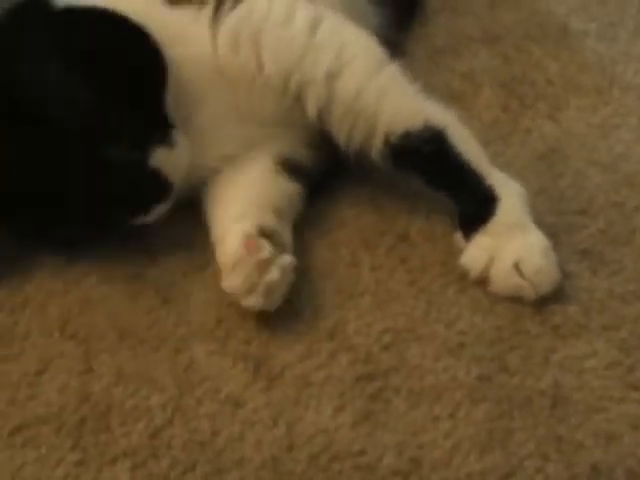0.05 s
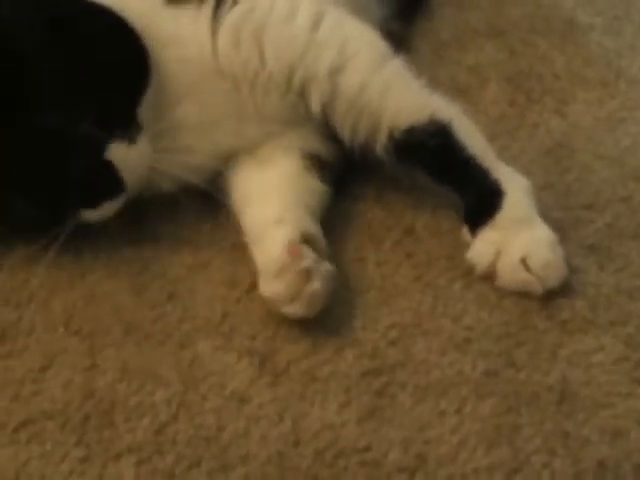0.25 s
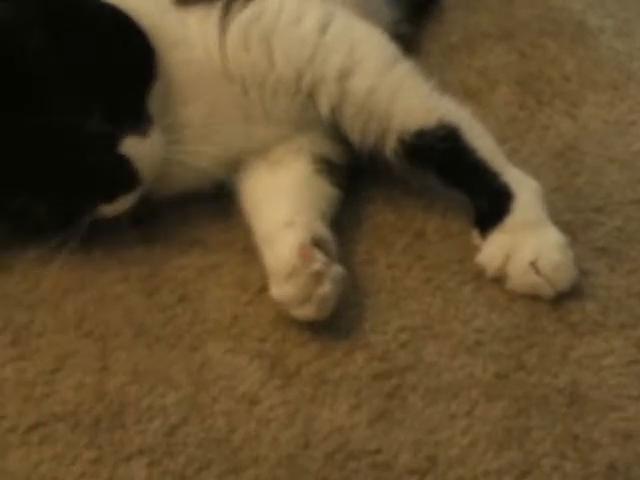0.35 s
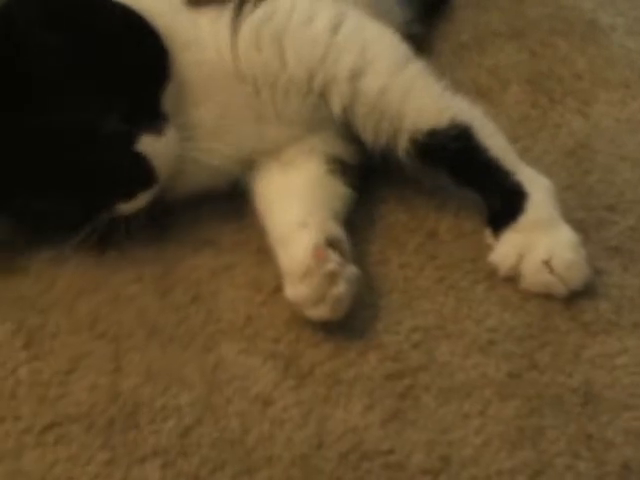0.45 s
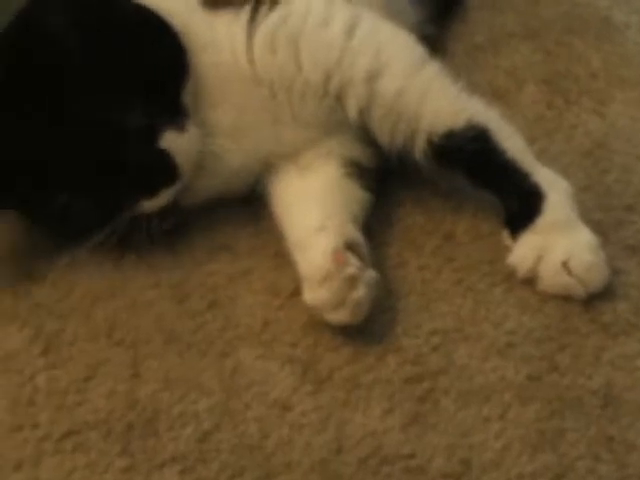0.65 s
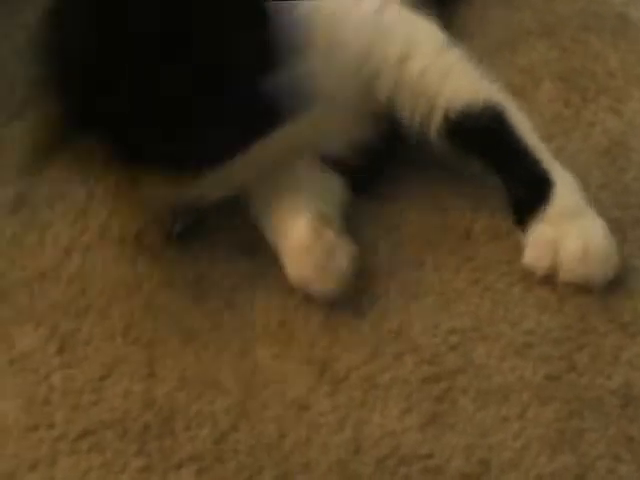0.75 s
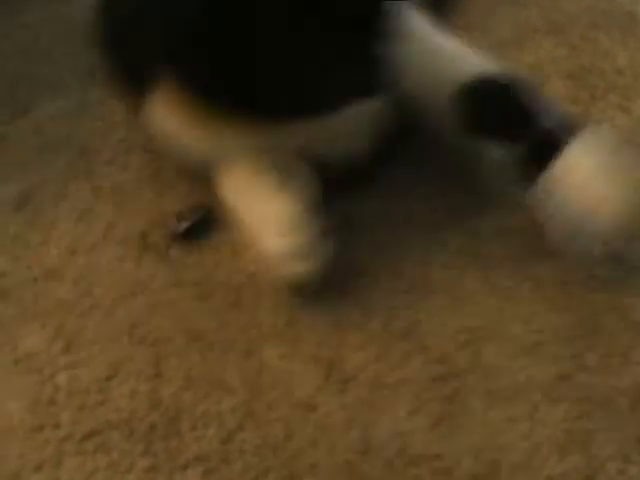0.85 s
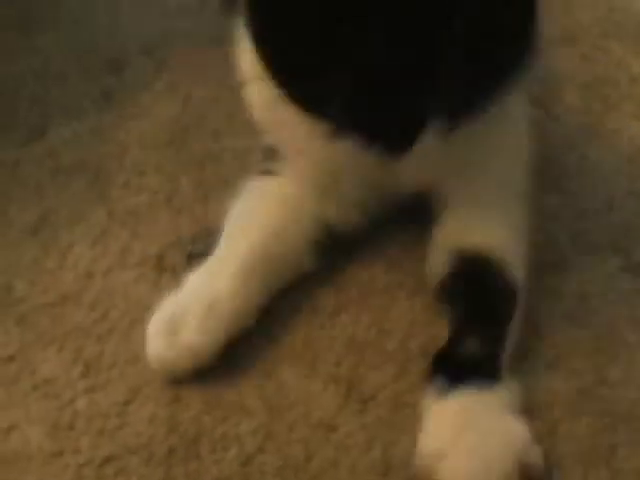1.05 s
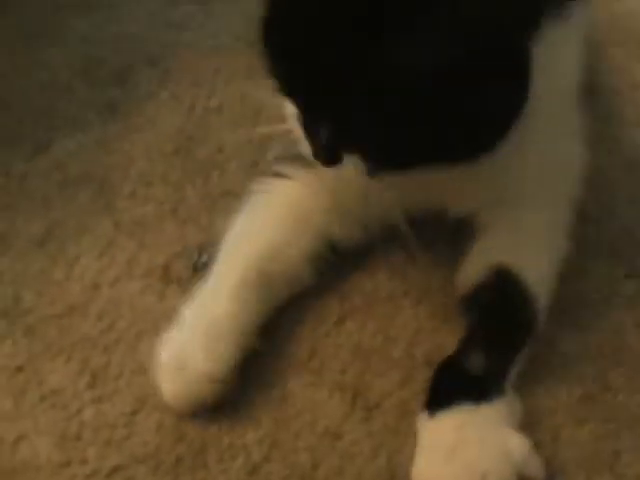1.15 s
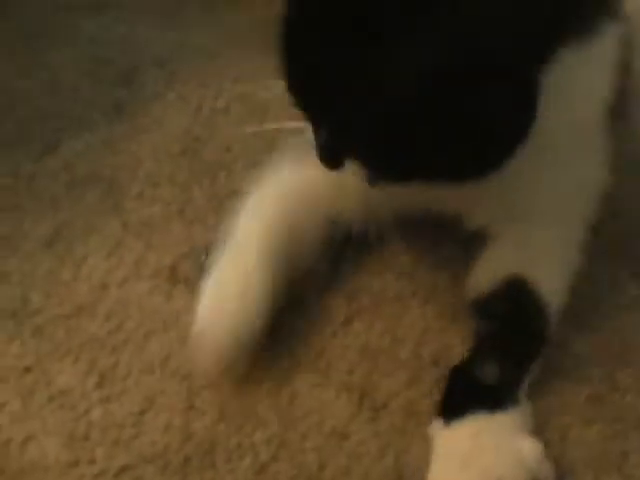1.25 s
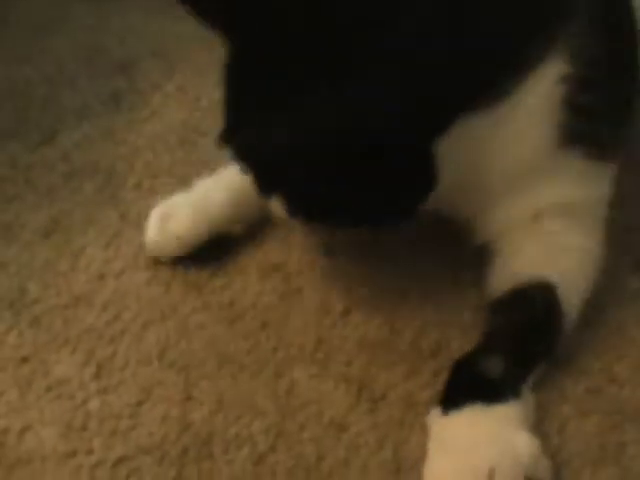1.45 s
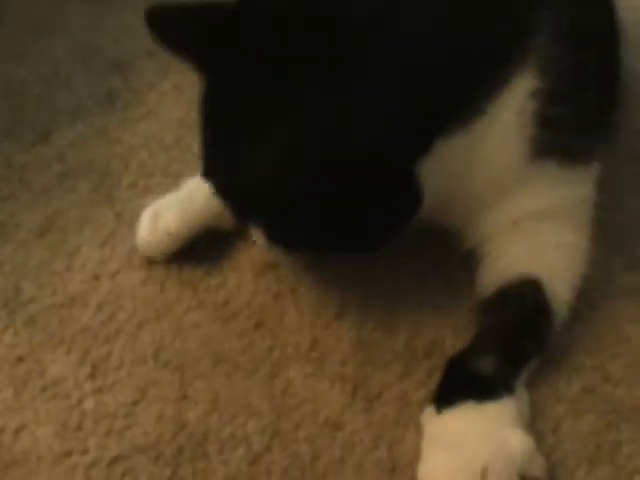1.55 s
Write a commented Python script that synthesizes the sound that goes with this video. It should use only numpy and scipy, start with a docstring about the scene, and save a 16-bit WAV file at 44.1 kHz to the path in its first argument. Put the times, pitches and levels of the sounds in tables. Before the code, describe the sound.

A cicada gives one short, high buzz among light clicks and a soft paw thud.

```python
"""Cicada pawed by a cat

A cicada on a carpet gives one short alarm buzz, with a few single clicks around it.
Its two tymbals buckle in turn, each with a low click and then a sharp high one.
Wings and claws tick on the pile, a paw lands softly, and the room hums and hisses."""
import sys
import numpy as np
from scipy import signal
from scipy.fft import rfft, irfft, next_fast_len
from scipy.io import wavfile
from scipy.ndimage import map_coordinates

SR = 44100
rng = np.random.default_rng(int(sys.argv[2]) if len(sys.argv) > 2 else 0)


def wav_out(sig):
    """Save sig, one row per channel (or a flat mono array), as 16-bit PCM at SR to the path in sys.argv[1]."""
    wavfile.write(sys.argv[1], SR, np.round(np.clip(np.atleast_2d(sig).T, -1, 1) * 32767).astype(np.int16))


N = 70560

# Appliance hum. Each row: pitch in Hz, rms level in dB.
HUM_TONES = [(60, -75), (101.5, -64), (120, -57), (176, -68), (240, -66), (409, -72)]
# Tone of the appliance whine and the room hiss. Each row: frequency in Hz, gain in dB.
WHINE_EQ = [(1500, -40), (1640, 10.5), (1685, 13), (1730, -15.5), (1900, -20)]
HISS_EQ = [(25, -19), (70, -3.5), (160, -1.5), (260, -4.5), (550, -9.5), (1400, -11), (2200, -15),
           (3600, -17.5), (5200, -14), (6900, -8), (9200, -12.5), (12000, -23), (14000, -29), (15500, -77)]
# Dry ticks and soft scuffs. Each row: start in seconds, level in dB, length in seconds, body in dB.
TICKS = [(.0045, -41, .006, 11), (.096, -53, 0.014, -14), (.1225, -47, 0.0043, 0), (.170, -51, 0.0084, 6),
         (.1928, -41.5, 0.0045, -6), (.4245, -43.5, 0.0037, 2), (.561, -41.5, 0.0024, -9),
         (1.358, -55.5, 0.048, -6), (1.4456, -37, 0.0036, 3), (1.4712, -44, 0.0023, -6),
         (1.4785, -44.5, 0.0017, 11), (1.4888, -42, 0.0014, -8), (1.5155, -38.5, 0.0051, 8),
         (1.5203, -43, 0.0017, 0), (1.5672, -38, .0025, -4), (1.595, -37, 0.003, 7.5)]
SCUFFS = [(.096, -55, 0.013, 4), (.1215, -48.5, 0.008, 3), (.423, -52, 0.0067, 0), (.85, -61, 0.062, 2),
          (1.075, -56, 0.037, 0), (1.339, -48.5, 0.01, -2), (1.3502, -46, 0.00406, -8),
          (1.356, -56.5, 0.033, -2)]
# Their tone. Each row: frequency in Hz, gain in dB.
TICK_EQ = [(300, -7), (1200, -5.5), (3200, -7), (5000, -10.5), (8000, -1), (12200, 1), (14200, -2),
           (15700, -46)]
SCUFF_EQ = [(60, -1), (200, -2), (480, 2), (780, -3), (1080, 0.5), (1500, -2), (3000, -6), (7000, -17),
            (12000, -30), (15700, -57)]
# The shelf that gives them body. Each row: frequency in Hz, share of the boost.
BODY_SHELF = [(3500, 0.79), (9000, 0.21)]
# Lone tymbal contractions. Each row: time in seconds, level in dB.
SINGLE_CLICKS = [(.2115, -7), (.3967, -9.5), (.4877, -12), (.5367, -10.5)]
# Pace of each tymbal in the buzz. Each row: time in seconds, contractions per second.
BUZZ_PACE = [(.2285, 100), (.243, 103), (.255, 112), (.287, 112), (.312, 119), (.347, 113), (.358, 98),
             (.375, 102)]
# Ring of the first and second buckling. Each row: frequency in Hz, gain in dB.
LOW_CLICK_EQ = [(1500, -36), (2700, -23.5), (4100, -4.5), (5550, 3.5), (6800, -10), (8800, -6.5),
                (11300, -24), (13300, -10), (14600, -39), (15700, -57)]
HIGH_CLICK_EQ = [(1500, -34), (2800, -24.5), (4300, -11), (5800, -4.5), (6600, 0.5), (7400, 5), (9200, 2.5),
                 (11300, -6.5), (12800, -6), (14500, -39), (15700, -45)]
# Weight of the clicks' lower band, fullest mid-buzz. Each row: time in seconds, boost in dB.
FULLNESS = [(.21, 1.5), (.232, 2.5), (.26, .5), (.287, 3.5), (.315, 1.7), (.34, -2), (.37, -1.5),
            (.4, -2.5), (.54, -2.5)]
# The shelf for that weight. Each row: frequency in Hz, share of the boost.
FULLNESS_SHELF = [(3200, 0.83), (5600, 1.1), (6600, 1.2), (7200, -0.42), (9500, -0.018)]
# Paw thuds. Each row: start in seconds, level in dB, settled pitch in Hz, 60 dB decay in seconds.
PAW_THUDS = [(1.31, -30.5, 228.3, 0.074), (1.338, -35.5, 95.6, 0.075)]
# Width of the noise. Each row: frequency in Hz, left-right correlation.
STEREO_LIKENESS = [(100, 1), (600, 0.99), (1400, 1), (3400, 1), (6200, 1), (9000, 0.91), (12000, .4)]
# Pan of the close sounds. Each row: frequency in Hz, right minus left in dB.
RIGHT_LEAN = [(9200, -0.5), (10300, 4), (11700, 10), (13000, -1)]
# Their phase offset. Each row: frequency in Hz, left lead in radians.
LEFT_LEAD = [(10400, 0), (11700, 1), (13000, 0.023), (14500, 0)]
# Treble roll-off. Each row: frequency in Hz, gain in dB.
TREBLE_ROLLOFF = [(13000, 0), (14200, -4), (15700, -20)]


def amp(db):
    return 10 ** (np.asarray(db) / 20)


def along(points, hz):
    """Read a curve on a log frequency axis."""
    freqs, values = np.transpose(points)
    return np.interp(np.log(hz + 1), np.log(freqs + 1), values)


def add(track, start_s, sound):
    """Mix a sound into the track."""
    part = track[..., max(round(start_s * SR), 0):][..., :sound.shape[-1]]
    part += sound[..., :part.shape[-1]]


def filtered(x, response):
    """Apply an EQ given as a function of Hz."""
    n = x.shape[-1]
    size = next_fast_len(2 * n)
    return irfft(rfft(x, size) * response(np.fft.rfftfreq(size, 1 / SR)), size)[..., :n]


def shelved(eq, shelf, db):
    """The EQ curve with one band raised by db."""
    return [(hz, level + db * along(shelf, hz)) for hz, level in eq]


def ring(eq, pitch=1, size=512):
    """A minimum-phase click with this tone, its envelope peaking at 1."""
    hz = np.fft.rfftfreq(size, 1 / SR)
    cepstrum = irfft(np.log(amp(along(eq, hz / pitch))))
    cepstrum[1:size // 2] *= 2
    cepstrum[size // 2 + 1:] = 0
    click = irfft(np.exp(rfft(cepstrum)))
    return click / np.abs(signal.hilbert(click)).max()


def noise_pair(n=SR // 4):
    """White noise at two close microphone ports, wide only at the top."""
    def width(hz):
        angle = np.arccos(along(STEREO_LIKENESS, hz)) / 2
        return np.array([np.cos(angle), np.sin(angle)])
    mid, side = filtered(rng.standard_normal((2, n)), width)
    return np.array([mid + side, mid - side])


def wobble(rate):
    """A smooth random curve, rate knots a second."""
    knots = rng.standard_normal(int(N * rate / SR) + 4)
    return map_coordinates(knots, [np.arange(N) * rate / SR])


def in_room(sound, reflections):
    """Add quick scatter off the floor and the cat, and a short room tail."""
    t = np.arange(reflections.shape[1]) / SR
    def tail(db, t60):
        fade = amp(-60 * t / t60)
        return amp(db) * fade / np.linalg.norm(fade)
    response = reflections * np.hypot(tail(db=-11, t60=.028), tail(db=-15, t60=.2))
    response[:, 0] += 1  # direct sound
    return signal.fftconvolve(sound[None], response, axes=1)


def room_tone(waver_db=2.5, hiss_db=-52.5, whine_db=-67):
    """A wavering appliance hum and a thin whine over steady hiss."""
    t = np.arange(N) / SR
    bed = np.zeros((2, N))
    for hz, db in HUM_TONES:
        peak = np.sqrt(2) * amp(db + waver_db * wobble(4.86))
        bed += peak * np.sin(2 * np.pi * (hz * t + rng.random()))
    for eq, db in [(HISS_EQ, hiss_db), (WHINE_EQ, whine_db)]:
        noise = filtered(noise_pair(N), lambda hz: amp(along(eq, hz)))
        bed += amp(db) * noise / np.sqrt(np.mean(noise ** 2))
    return bed


def crackles(events, eq, spiky_db=5):
    """Wing and claw ticks or carpet scuffs: each is a brief cluster of tiny snaps."""
    out = np.zeros((2, N))
    for start, db, length, body_db in events:
        n = int(length * SR)
        noise, spikes = rng.standard_normal((2, SR // 10))[:, :n]
        grains = noise * amp(spiky_db * spikes) * signal.windows.tukey(n)
        snaps = np.convolve(grains, ring(shelved(eq, BODY_SHELF, body_db)))
        snaps *= np.sqrt(n) / np.linalg.norm(snaps)
        add(out, start, amp(db) * in_room(snaps, noise_pair()))
    return out


def split(click, snap_db=-9.5):
    """The sharp click splits: a weaker snap follows right behind."""
    delay_s = rng.uniform(.00008, .0004)
    return filtered(click, lambda hz: 1 + amp(snap_db) * np.exp(-2j * np.pi * hz * delay_s))


def cicada(buzz_db=-8.5, rise_db_per_s=11, scatter_db=.64, low_db=-7.5, lead_s=.00222, drift=.75):
    """Two tymbals take turns; every contraction buckles twice, low then high."""
    times, rates = np.transpose(BUZZ_PACE)
    t = np.arange(times[0], times[-1], 1 / SR)
    cycles = np.cumsum(np.interp(t, times, rates)) / SR
    buzz = []
    for lag in (0, .405):  # the second tymbal trails by part of a cycle
        for when in np.interp(np.arange(lag, cycles[-1]), cycles, t):
            swell_db = rise_db_per_s * (when - times.mean())
            buzz.append((when, buzz_db + swell_db + rng.normal(0, scatter_db)))
    out, still = np.zeros((2, N)), noise_pair()
    for when, db in buzz + list(SINGLE_CLICKS):
        low_pitch, high_pitch = np.exp(rng.normal(0, .018, 2))
        full_db = np.interp(when, *np.transpose(FULLNESS))
        # The insect struggles, so a share of the reflections changes with each click.
        reflections = np.sqrt(1 - drift) * still + np.sqrt(drift) * noise_pair()
        first_db = db + low_db + .5 * full_db + rng.normal(0, scatter_db)
        low = ring(shelved(LOW_CLICK_EQ, FULLNESS_SHELF, full_db), low_pitch)
        high = ring(shelved(HIGH_CLICK_EQ, FULLNESS_SHELF, full_db), high_pitch)
        add(out, when - lead_s, amp(first_db) * in_room(low, reflections))
        add(out, when, amp(db) * in_room(split(high), reflections))
    return out


def paw(bend=.66, settle_s=.0046, attack_s=.0031):
    """A padded paw meets the floor, then takes the weight: two thuds that drop in pitch."""
    t = np.arange(SR // 4) / SR
    out = np.zeros(N)
    for start, db, hz, t60 in PAW_THUDS:
        pitch = hz * (1 + bend * np.exp(-t / settle_s))
        envelope = amp(db - 60 * t / t60) * (1 - np.exp(-t / attack_s))
        add(out, start, envelope * np.sin(2 * np.pi * np.cumsum(pitch) / SR))
    return out


def close_pan(hz):
    """Left and right gains for close sounds: the top end leans right."""
    level = amp(np.outer([-.5, .5], along(RIGHT_LEAN, hz)))
    phase = np.outer([.5, -.5], along(LEFT_LEAD, hz))
    return level * np.exp(1j * phase)


def scene():
    """Cicada and ticks up close, over scuffs, paw and room tone."""
    close = filtered(cicada() + crackles(TICKS, TICK_EQ), close_pan)
    return close + crackles(SCUFFS, SCUFF_EQ) + paw() + room_tone()


def record(dry):
    """The top treble fades above 13 kHz and stops at 15.7 kHz."""
    top_hz = 15700
    return filtered(dry, lambda hz: amp(along(TREBLE_ROLLOFF, hz)) * (hz < top_hz))


dry = scene()
out = record(dry)
wav_out(out)
```